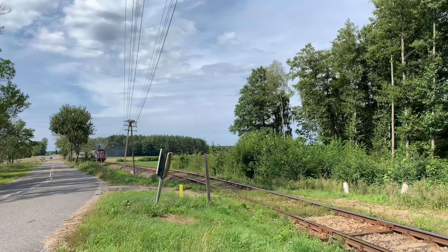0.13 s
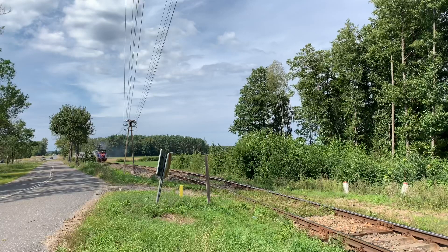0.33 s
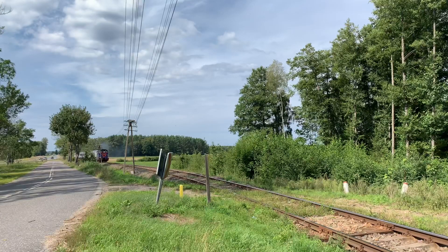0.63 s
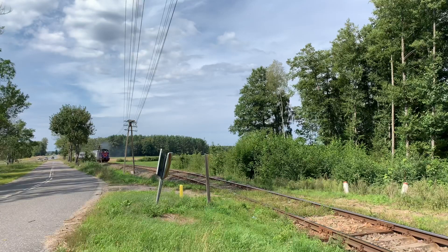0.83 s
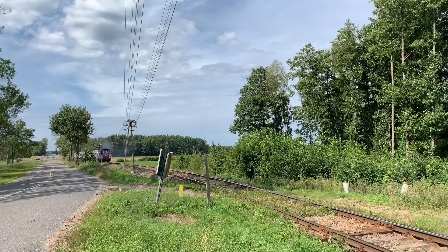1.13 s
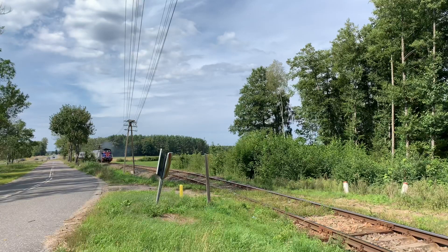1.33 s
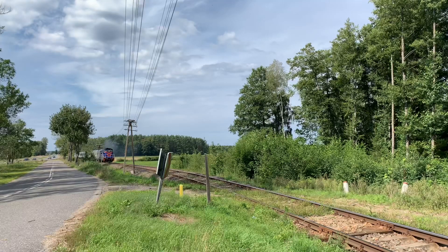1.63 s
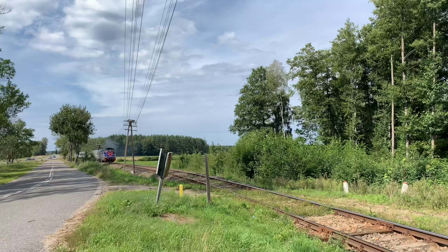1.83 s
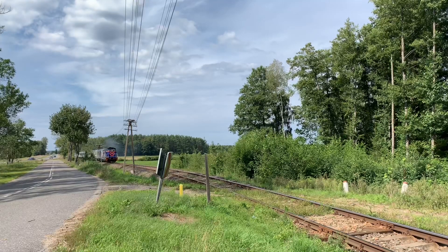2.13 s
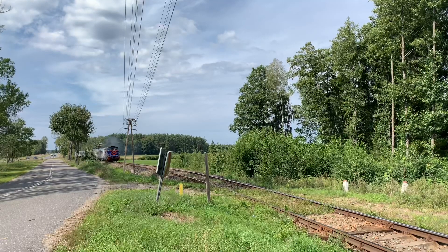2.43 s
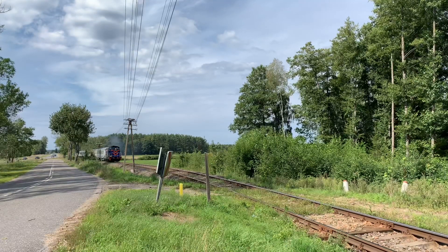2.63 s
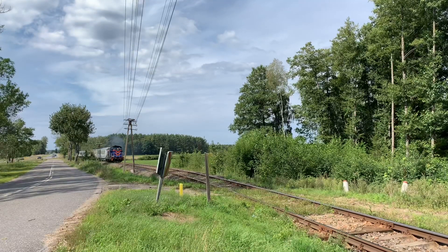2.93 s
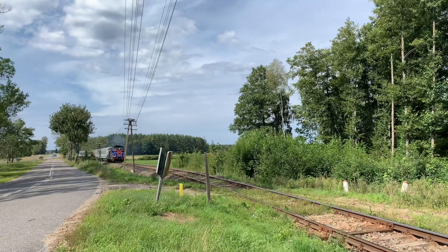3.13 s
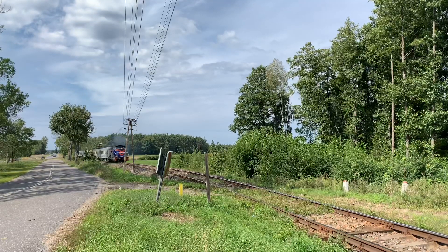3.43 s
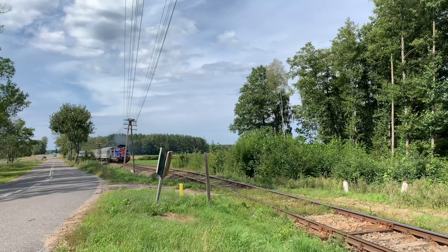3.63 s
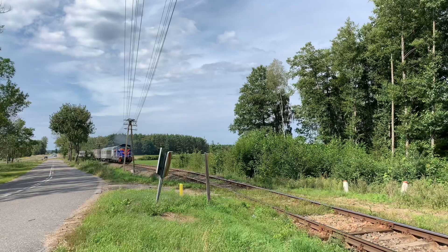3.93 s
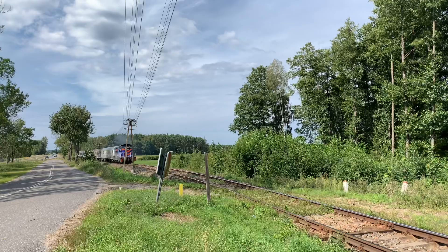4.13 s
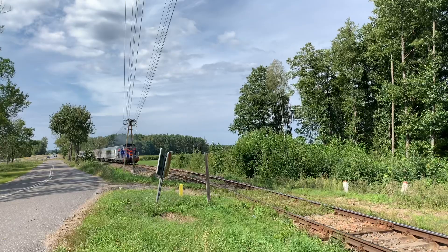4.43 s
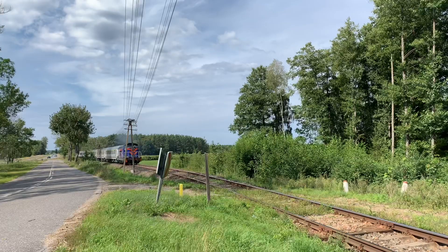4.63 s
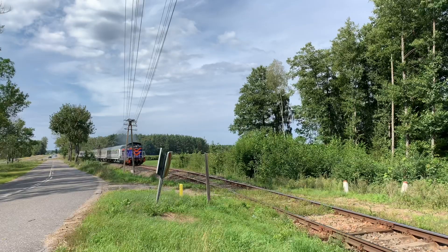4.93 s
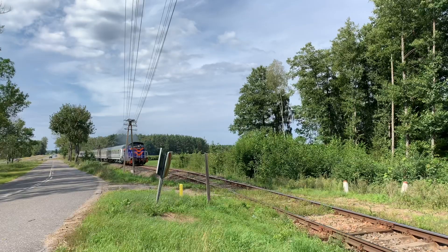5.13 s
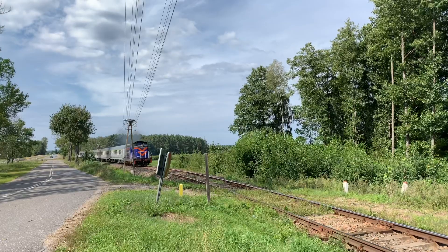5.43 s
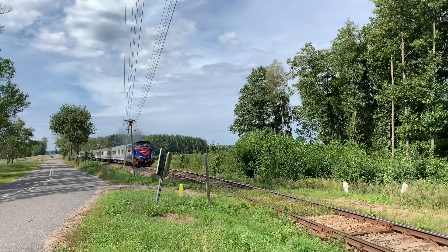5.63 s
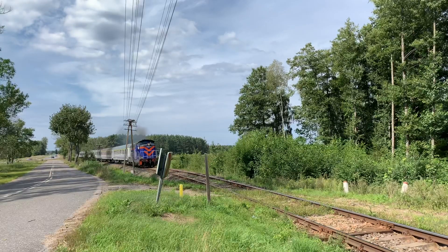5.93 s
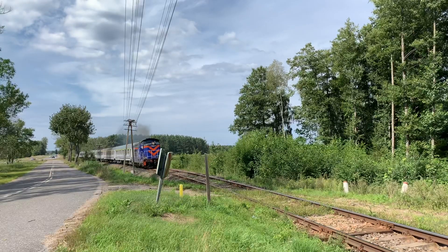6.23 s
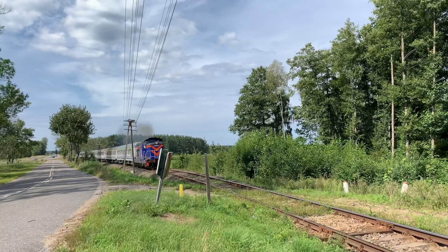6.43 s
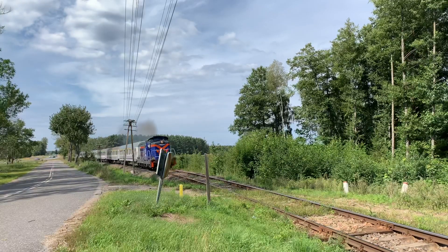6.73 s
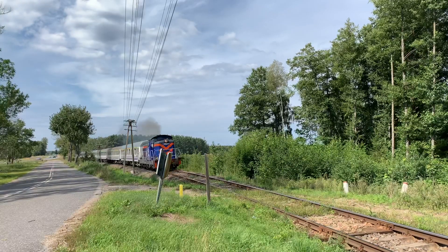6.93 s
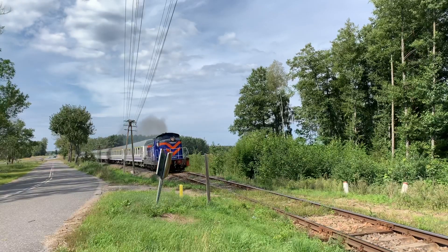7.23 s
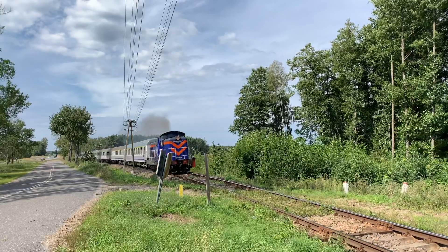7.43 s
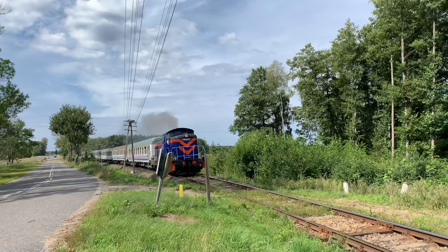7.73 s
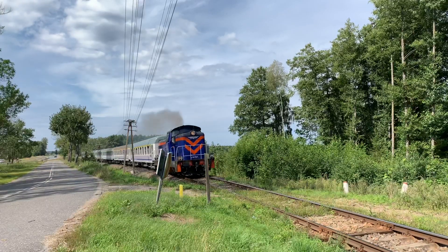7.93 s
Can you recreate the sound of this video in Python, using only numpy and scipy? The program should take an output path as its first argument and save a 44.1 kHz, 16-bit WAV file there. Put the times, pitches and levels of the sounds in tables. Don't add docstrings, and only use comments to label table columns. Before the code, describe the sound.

A distant diesel train sounds one short horn blast that echoes off trees, then its throbbing engine and rolling rumble slowly grow through buffeting wind.

```python
import sys
import numpy as np
from scipy import signal
from scipy.fft import rfft, irfft, next_fast_len
from scipy.io import wavfile

SR = 44100
rng = np.random.default_rng(int(sys.argv[2]) if len(sys.argv) > 2 else 0)


def ratio_of_db(decibels):
    return 10 ** (np.asarray(decibels, float) / 20)


def master_out(mix):
    frames = np.transpose(np.atleast_2d(mix))
    ceiling = np.clip(frames, -1, 1)
    pcm = np.round(ceiling * 32767).astype(np.int16)
    wavfile.write(sys.argv[1], SR, pcm)


N = 356769
T = np.arange(N) / SR
STEP = 16
COARSE = T[::STEP]
LEFT_RIGHT = np.array([[1], [-1]])

# (frequency [Hz], likeness [0-1], left lead [rad], left-right balance [dB])
PORTS = [(60, .8, .1, -.8), (150, .96, .1, -1), (350, .9, .4, -.5), (800, .55, .5, 2.5),
         (1160, .35, .75, 2.5), (1500, .25, 0, 2.5), (2300, .6, 1.6, 1), (3100, .7, 2.8, 0),
         (4700, .5, 1.8, -1.5), (6000, .5, 2.1, -1.5), (6900, .85, .7, -1), (7600, .9, 0, 0),
         (8600, .75, -1.5, 0), (10300, .95, -3.14, 0), (11700, .9, -4.2, 0), (13300, .9, -6.0, 0),
         (15300, .8, -7.9, 0)]

ARRIVAL_S, REFERENCE_S = 10.12, 5.36
LOAD_FROM_S, LOAD_FULL_S = 0.85, 3.6
# (time [s], level at the top [dB])
SCREEN = [(0, -30), (2.6, -25), (3.3, -22), (4.1, -17.5), (5.0, -13.5), (5.45, -11), (6.2, -16), (7.0, -11),
          (7.45, -8), (7.53, -1), (8.09, 2)]
# (frequency [Hz], share [1])
SCREEN_SHARE = [(400, 0.0057), (1000, 0.19), (2000, 0.18), (4000, 0.33), (6500, 1.07), (9000, 1.16)]

CYCLE_HZ = 7.852
PIPE_TURN_RAD = 2.75
WEAK_DB, WEAK_SPREAD = -9, 0.57
# (multiple of the engine cycle [1], level [dB], share of the approach [1])
STRONG_ORDERS = [(4, -29, 1.1), (12, -30.5, 1.21), (16, -33, 0.86)]
# (multiple of the engine cycle [1], level [dB])
WEAK_ORDERS = [(3, -51.5), (5, -46), (6, -40.5), (7, -28), (8, -42), (9, -38), (10, -56), (11, -33),
               (13, -36.5), (14, -36.5), (15, -33), (17, -40), (18, -47), (19, -34.5), (20, -51.5),
               (21, -45), (22, -55.5), (23, -58), (24, -63), (25, -59), (26, -53.5), (27, -62.5),
               (28, -57.5), (29, -58), (30, -42.5), (31, -60.5), (32, -41.5), (33, -41.5)]
# (order [1], time [s], level [dB], half length [s])
EXHAUST_FADES = [(4, 1.4, 5, 0.76), (4, 2.0, -5.5, 0.3), (4, 3.5, -13, 0.39), (4, 3.87, -4, .3),
                 (12, 0.052, 7, 0.44), (12, 1.7, -7.5, 0.44), (12, 3.8, -3.5, 1), (12, 6.06, 6, 0.49),
                 (16, 1.98, -10, 0.44), (16, 2.5, 6, 0.41), (16, 2.3, -6, 0.34), (16, 5.64, -6, 0.7),
                 (16, 7.58, 3.5, 0.6), (12, 6.05, -14, 0.089), (12, 6.55, -7, 0.098), (12, 8.5, -7, 0.037),
                 (12, 7.08, 2.5, .1), (12, 7.78, -4, .06), (12, 5.9, 3.5, .1), (12, 7.42, -4, 0.053),
                 (16, 6.2, 8, 0.16), (16, 6.1, -3, 0.088), (32, 7.7, 4, .1), (32, 6.9, 9.5, 0.11),
                 (32, 6.72, 17, 0.13), (32, 4.5, 7, 0.22), (32, 7.97, 16.5, 0.073)]

BLADES = 30.25
HUM_DB, HUM_IDLE_DB, GEAR_DB, GEAR_IDLE_DB, WHISTLE_DB = -30, -18, -40.5, -10.5, -74
# (time [s], shaft speed [Hz])
BLOWER_SPEED = [
    (0, 154.9),
    (1.5, 158.6),
    (2.8, 158.7),
    (3.45, 155.5),
    (3.8, 153.2),
    (4.2, 150.6),
    (6, 146.5),
    (8.09, 140),
]
# (multiple of the shaft hum [1], level [dB])
GEAR_PARTIALS = [(1.41, -19.5), (1.84, -9), (2.43, -9.5)]
# (time [s], level [dB], half length [s])
HUM_SWELL = [
    (2.5, 7, .2),
    (3.2, -4.5, 0.3),
    (3.7, -9, .07),
    (4.2, -9, 0.066),
    (5.55, -2.5, .1),
    (7, -4.5, 1.126),
]
# (time [s], level [dB], half length [s])
GEAR_SWELL = [
    (4.83, 9.5, 2.5),
    (3.88, 5, 0.17),
]
# (time [s], level [dB], half length [s])
WHISTLE_SWELL = [
    (3.85, 17.5, 2.19),
    (4.38, 8, 0.23),
    (2.7, 1, .2),
    (3.25, 12, .03),
    (3.65, -6, .04),
    (3.9, 3, .03),
    (3.99, 8, 0.07),
    (4.4, -10, .02),
]

RUMBLE_IDLE_DB, RUMBLE_TOP_HZ, ROAR_SPREAD, TOP_CLEAR_DB = -5.5, 380, 0.63, 14
BASS_FROM_HZ, BASS_SHARE = 90, .15
# (frequency [Hz], density [dB per Hz])
ROAR_COLOUR = [(24, 0), (42, 2), (64, -0.5), (160, -9), (370, -15), (520, -20), (850, -20.5), (1300, -33),
               (2320, -31), (3330, -36), (4660, -39), (5580, -57.5), (6500, -48), (7500, -51), (9100, -55),
               (10400, -62.5), (12200, -74)]

PANEL_DB, SQUEAL_DB, SQUEAL_SHARE, LOW_SQUEAL_SHARE = -36.5, -46.5, 3.1, 0.93
# (frequency [Hz], width [Hz], level [dB])
RAIL_TONES = [(1885, 50, -8), (1952, 35, -7.5), (2080, 25, -6), (2290, 140, -1), (2700, 350, 0),
              (4650, 300, -10), (7340, 120, -11)]
# (frequency [Hz], width [Hz], level [dB])
PANEL_MODES = [(385, 15, -28.5), (492.3, 21.5, -8.5), (578.4, 13, -16), (629.4, 26, -18), (253.3, 31, -10),
               (539.5, 90, -13), (768, 90, -14)]
# (time [s], level [dB], length [s])
JOINTS = [
    (5.126, -51.5, .05),
    (5.557, -53, 0.06),
    (7.1, -52, 0.042),
    (7.5, -40, 0.018),
    (7.575, -41, 0.06),
]
# (time [s], frequency [Hz],
# width [Hz], level [dB], length [s])
SHRIEKS = [(3.52, 2280, 220, -51.5, 0.26), (5.05, 2270, 90, -58, 0.22), (5.58, 1910, 170, -56, .24),
           (6.7, 2300, 130, -52, .09), (6.9, 2080, 30, -52, .07), (7.08, 2280, 200, -48.5, .16),
           (7.1, 1260, 250, -44, .12), (7.665, 7350, 200, -44, .018), (7.75, 7300, 300, -45, .008),
           (7.892, 7250, 200, -42, .014), (8.0, 7300, 120, -45, .05), (7.6, 280, 90, -35, 0.13),
           (5.45, 550, 170, -39.5, .4), (7.604, 1940, 140, -42, .03), (7.602, 1600, 150, -42, .02),
           (7.62, 2350, 200, -40, .04), (7.84, 2004, 150, -45, .02), (2.63, 388, 25, -41, .07),
           (8.042, 2240, 120, -39, 0.047)]

CALM_DB = -43
# (time [s], level over calm [dB], half length [s])
GUSTS = [(.6, -1, 0.11), (1.08, 9.5, 0.35), (1.62, 9.5, 0.35), (2.05, 15.5, 0.35), (2.4, 11, 0.29),
         (2.85, 12.5, 0.37), (3.4, 13, 0.65), (4.2, 14.5, 0.5), (4.65, 12, 0.33), (5.3, 15, 0.33),
         (5.6, 11, 0.17), (6.12, 12.5, 0.31), (7.12, 8, 0.1), (7.66, 8, 0.12)]
# (time [s], peak level
# [dB], # frequency [Hz], push +1 or pull -1)
KNOCKS = [(0, -17, 60, -1), (0.05, -2, 124.4, -1), (1.098, -6, 156, -1), (2.0595, -14, 151, 1),
          (2.091, -2, 97.5, -1), (2.488, -2.5, 100, 1), (2.681, -3.5, 115.8, -1), (2.9997, -3.5, 97.6, 1),
          (3.0888, -3, 118, 1), (3.2826, -3.5, 119, 1), (3.314, -4.5, 116, 1), (3.459, -4, 150, 1),
          (3.4832, 4, 154, -1), (3.58, -4.5, 133, -1), (3.6474, 3, 166, 1), (3.6917, 0.5, 99, 1),
          (3.906, -6, 123, -1), (4.1125, 2, 111, -1), (4.2078, -1, 116, -1), (4.865, -2.5, 115.4, -1),
          (5.0421, -0.5, 153, 1), (5.1563, -2.5, 142, 1), (5.543, -4, 96, 1), (6.243, -4, 106, -1),
          (6.328, -9, 129, -1), (6.4072, -6, 127, 1), (6.759, -9, 130, 1)]
# (time [s], level [dB], length [s])
BUFFETS = [
    (1.095, -32.5, 0.026),
    (2.063, -24.5, 0.037),
    (3.22, -29.5, 0.035),
    (3.464, -36.5, 0.032),
    (6.648, -32, 0.13),
]

CRICKET_HZ, CRICKET_WIDTH_HZ, CRICKET_DB, CHORUS_SHARE = 4684, 270, -56.5, 0.57
RASP_DB, RASP_SHARE, RASP_FLOOR_DB = -56.5, 1.7, -92
FIELD_DB, GRASS_DB = -47, -86.5
# (time [s], peak level [dB], lower band level [dB], decay [s])
TICKS = [(5.14, -70, 10, 0.036), (5.347, -54.5, 7, .017), (5.725, -71, 7, .02), (5.921, -57, -5, .016),
         (6.264, -58, 1, .018), (6.452, -62, 3, .02), (7.421, -52.5, -18, 0.055), (7.491, -45, -9, 0.033),
         (7.7513, -54.5, 1, 0.0091), (7.876, -57, 16, .02), (8.045, -54, -5, .03)]

HORN_HZ, HORN_DB, HORN_SAG_DB, AIR_DB = 388.3, -14, -1, -56
HORN_S, HORN_ATTACK_S, HORN_CLOSE_S, HORN_RELEASE_S = 1.219, 0.035, 1.969, 0.11
SPEAK_LATER_S, CLOSE_EARLIER_S = 0.0062, 0.0038
DROP_DB, DROP_DB_PER_PARTIAL, ECHO_DB_PER_S, ECHO_END_S = 9, 2, 41.5, 2.65
# (multiple of the pitch [1], level [dB])
HORN_ORDERS = [(1, -4.5), (2, 0), (3, -7), (4, -16), (5, -23.5), (6, -29), (7, -27), (8, -29.5), (9, -44.5),
               (10, -36.5), (11, -40.5), (12, -46), (13, -50), (14, -52.5), (15, -55), (16, -54),
               (17, -49.5), (18, -49.5), (19, -46.5), (20, -49), (21, -52.5), (22, -51.5), (23, -57.5),
               (24, -65), (25, -61.5), (26, -66.5), (27, -68), (28, -68.5), (29, -74)]
HORN_PAN_DB = [-0.5, 1, 2, 9, 8, 5.5, -1]
# (pitch ratio [1], delay [s], level [dB])
HORN_ECHOES = [
    (.935, .12, -29),
    (.95, .1, -51),
    (.965, .07, -28.5),
    (.98, .05, -35.5),
]
# (partial [1], time [s], left
# [dB], right [dB], half length [s])
HORN_FADES = [(1, 1.603, -14, -15, 0.2), (1, 1.99, 10, 6.5, 0.13), (1, 2.15, -4, -5.5, 0.094),
              (1, 2.3, 8, 10.5, 0.048), (1, 2, -9.5, -7.5, 0.092), (2, 1.748, -8, -6.5, 0.29),
              (2, 1.86, 6, -23, 0.09), (2, 2.06, -30, 2.5, 0.052), (2, 2.1, 9.5, -24, .04),
              (2, 1.62, 6.5, -3.5, 0.09), (3, 1.1, -5.5, -1, 0.27), (3, 1.66, 5, 1.5, 0.13),
              (3, 1.75, -8, -6, 0.067), (3, 1.945, -2.5, -6, 0.11), (3, 1.9, -7, 0.5, 0.072),
              (3, 2, 3, 8.5, 0.046), (4, 1.9, -2.5, -6, 0.14), (4, 2.2, -1, -8, .05),
              (2, 1.26, -6, -6, 0.055), (3, 2.3, 4, 0, 0.034), (4, 2.0, -10, -6, 0.09),
              (3, 2.14, -12, 3.5, .035), (3, 2.6, 6, 7, .05), (3, 2.1, -9, -5, .025), (2, 2.2, 5, -6, .08),
              (2, 2.15, 1.5, 4, .035), (2, 2.28, -3, -10, .025), (2, 2.33, 2, 1, .04),
              (4, 2.19, 8, 0, 0.045), (3, 2.245, 5, 8, 0.061), (3, 1.97, -4, -3, .04), (2, 1.6, -5, 1, .06),
              (2, 2.075, 3, 6, .03), (4, 1.6, 0.5, -6, .06), (4, 1.5, -0.5, -8.5, 0.0247),
              (4, 1.86, 0, -9, .025), (3, 2.25, -1, 4, .12), (5, 1.75, 1, 5, .12),
              (6, 1.72, -1, -4.5, 0.18), (7, 1.66, 5, 6.5, 0.086),
              (5, 1.29, 5, 2, 0.055), (5, 1.37, 5.5, -5, .05), (5, 1.5, 2, -8, .06), (5, 1.6, -4, 0.5, .12),
             (5, 1.93, 1.5, 3, .09), (5, 1.81, -8, -1, .04), (5, 1.85, 4.5, -6, .04), (6, 1.29, 1, 8, .04),
             (6, 1.36, 2, -5, .07), (6, 1.47, -7, -2.5, .07), (6, 1.65, 4, 12, 0.12), (6, 1.78, -6, 6, .11),
             (6, 1.85, -1, -9, .05), (6, 1.8, 0, 4, .05), (7, 1.27, 7, 9.5, 0.044),
             (7, 1.49, -10, -15, .07), (7, 1.8, -7, -10, .05), (4, 1.6, -0.5, -3.5, 0.15),
             (7, 1.77, -11, -11, 0.041), (7, 1.85, 4, 6, .05), (7, 2.09, 20.5, 17, 0.13),
             (7, 2, 9, 10, .06), (8, 1.36, -8, -8, .08), (8, 1.75, -4, -3, .05), (8, 1.53, -8, -8, .1),
             (8, 2.02, 12.5, 13, .08), (9, 1.8, 9, 9, .2), (10, 1.41, 4.5, 6, .07), (10, 1.62, 4, 9, .07),
             (10, 1.85, -8, -9, .04), (10, 2.016, 16, 12, 0.12), (11, 1.36, 7, 10, 0.043),
             (11, 1.66, 9, 6, .08), (11, 1.6, -7, -7, .04), (4, 2.1, -6, 5, .3), (3, 2.9, -3, 6, .13),
             (5, 1.67, 1, -8, .025), (5, 2.2, 10, 10, .035), (7, 2.17, 12, 6.5, .04), (6, 1.6, -2, -8, .02)]
# (time [s], level [dB], half length [s])
SHIMMER = [
    (1.29, -1, .03),
    (1.4, 5.5, 0.047),
    (1.48, -3, .04),
    (1.53, 4, .025),
    (1.59, 7.5, .03),
    (1.63, -5, .025),
    (1.7, 5.5, .05),
    (1.82, -3, .03),
    (1.88, 6, 0.054),
    (2.0, 14, 0.11),
]


def rms_one(x):
    return x / np.sqrt(np.mean(x ** 2) + 1e-20)


def in_time(rows):
    s, *columns = np.transpose(rows)
    return [np.interp(T, s, c) for c in columns]


def at_hz(points, hz, axis=1):
    return np.interp(np.log(hz), np.log(np.array(points)[:, 0]), np.array(points)[:, axis])


def drift(rate_hz, t=T):
    r = np.exp(-128 * np.pi * rate_hz / SR)
    slow = signal.lfilter([1], [1, -2 * r, r * r], rng.standard_normal(N // 64 + 1502))[1500:]
    return np.interp(t * SR / 64, np.arange(len(slow)), rms_one(slow))


def band(x, low_hz, high_hz, order=2):
    return signal.sosfilt(signal.butter(order, [low_hz, min(high_hz, .45 * SR)], "band", fs=SR, output="sos"), x)


def swells(rows, t=T):
    return sum(db * np.maximum(1 - np.abs(t - s) / half, 0) for s, db, half in rows) + 0 * t


def tone(phase, hz, pan_db=None, aside=0):
    pan_db = at_hz(PORTS, hz, axis=3) if pan_db is None else pan_db
    share = 1 / (1 + ratio_of_db(-pan_db))
    lead = at_hz(PORTS, hz, axis=2) / 2 + aside
    return np.sqrt(8) * np.array([share * np.sin(phase + lead), (1 - share) * np.sin(phase - lead)])


def port_noise():
    size = next_fast_len(N)
    hz = np.maximum(np.fft.rfftfreq(size, 1 / SR), 1)
    common, *own = rfft(rng.standard_normal((3, size)))
    alike = np.clip(at_hz(PORTS, hz), 0, 1)
    turn = np.exp(.5j * LEFT_RIGHT * at_hz(PORTS, hz, axis=2))
    mix = np.sqrt(alike) * common * turn + np.sqrt(1 - alike) * np.array(own)
    return irfft(mix * ratio_of_db(LEFT_RIGHT * at_hz(PORTS, hz, axis=3) / 2), size)[:, :N]


def narrow(white, modes, db, flicker_db):
    out = 0
    for hz, width, mode_db in modes:
        flicker = flicker_db * np.tanh(drift(7, COARSE))
        gain = np.interp(T, COARSE, ratio_of_db(db[::STEP] + mode_db + flicker))
        out = out + gain * rms_one(band(white, hz - width / 2, hz + width / 2))
    return out


def near_db(t=T):
    return 20 * np.log10((ARRIVAL_S - REFERENCE_S) / (ARRIVAL_S - t))


def idle():
    return np.interp(T, [LOAD_FROM_S, LOAD_FULL_S], [1, 0])


def exhaust_fade_db(order, t):
    return swells([row[1:] for row in EXHAUST_FADES if round(row[0]) == round(order)], t)


def engine():
    t = COARSE
    thump_db, third_db, fourth_db = [db + share * near_db(t) + exhaust_fade_db(k, t) for k, db, share in STRONG_ORDERS]
    beat = 2 * np.pi * (4 * CYCLE_HZ * t + .25) + .15 * drift(1.5, t)
    out = ratio_of_db(thump_db + 1.1 * drift(3, t)) * tone(beat, 31)
    for k, db in [(3, third_db), (4, fourth_db)]:
        locked = k * (beat - np.pi / 2) + np.pi / 2 + PIPE_TURN_RAD
        out += ratio_of_db(db + 1.5 * drift(9, t)) * tone(locked + 0.38 * drift(0.61, t), 110)
    weak_db = WEAK_DB + WEAK_SPREAD * near_db(t)
    for k, db in WEAK_ORDERS:
        phase = 2 * np.pi * (k * CYCLE_HZ * t + rng.random()) + 0.046 * k * drift(1.3, t)
        level_db = db + exhaust_fade_db(k, t) + weak_db + 3 * drift(3, t)
        out += ratio_of_db(level_db) * tone(phase, k * CYCLE_HZ)
    return signal.resample_poly(out, STEP, 1, axis=1, padtype="line")[:, :N]


def blower():
    shaft_hz, = in_time(BLOWER_SPEED)
    hum_db = HUM_DB + HUM_IDLE_DB * idle() + swells(HUM_SWELL)
    gear_db = GEAR_DB + GEAR_IDLE_DB * idle() + swells(GEAR_SWELL)
    whistle_db = WHISTLE_DB + swells(WHISTLE_SWELL)
    turn = 2 * np.pi * np.cumsum(shaft_hz) / SR
    out = ratio_of_db(hum_db + 2.2 * drift(8)) * tone(turn + .4 * drift(2.0), 150)
    for k, db in GEAR_PARTIALS:
        out += ratio_of_db(gear_db + db + 2.0 * drift(4.8)) * tone(k * turn + 0.23 * drift(3.0), 150 * k)
    return out + ratio_of_db(whistle_db + 3.5 * drift(35)) * tone(BLADES * turn + 1.1 * drift(40), 4650)


def roar():
    t = COARSE
    screen_db = in_time(SCREEN)[0][::STEP] + TOP_CLEAR_DB
    spread_db = ROAR_SPREAD * near_db(t)
    rumble_db = RUMBLE_IDLE_DB * idle()[::STEP] + 1.6 * drift(9.7, t)
    white = [port_noise(), port_noise()]
    together = drift(3.1, t)
    throb = np.cos(2 * np.pi * 4 * CYCLE_HZ * t)
    third_octaves = 22 * 2 ** (np.arange(24) / 3)
    edges = np.append(third_octaves, np.geomspace(5600, 12400, 7))
    out = 0
    for k, (low, high) in enumerate(zip(edges, edges[1:])):
        hz = np.sqrt(low * high)
        growth = BASS_SHARE + (1 - BASS_SHARE) / (1 + (BASS_FROM_HZ / hz) ** 4)
        rise_db = spread_db * growth + at_hz(SCREEN_SHARE, hz) * screen_db
        rise_db = rise_db + rumble_db / (1 + (hz / RUMBLE_TOP_HZ) ** 4)
        db = at_hz(ROAR_COLOUR, hz) + rise_db + 0.65 * together + 1.63 * drift(9.9, t) + 0.79 * throb
        out = out + np.interp(T, t, ratio_of_db(db)) * band(white[k % 2], low, high)
    return ratio_of_db(-2) * out


def rail():
    white = port_noise()
    screen_db, = in_time(SCREEN)
    high_tones = [mode for mode in RAIL_TONES if mode[0] > 3000]
    low_tones = [mode for mode in RAIL_TONES if mode[0] < 3000]
    out = narrow(white, high_tones, SQUEAL_DB + SQUEAL_SHARE * screen_db - 3.5, flicker_db=9.5)
    out += narrow(white, low_tones, SQUEAL_DB + LOW_SQUEAL_SHARE * screen_db, flicker_db=5.5)
    out += narrow(white, PANEL_MODES, PANEL_DB + ROAR_SPREAD * near_db(), flicker_db=6.0)
    for s, hz, width, db, length in SHRIEKS:
        near = slice(int((s - .7) * SR), int((s + .7) * SR))
        envelope = ratio_of_db(db) * np.exp(-((T[near] - s) / length) ** 2)
        out[:, near] += envelope * rms_one(band(white[0, ::-1][near], hz - width / 2, hz + width / 2))
    clatter = sum(ratio_of_db(db) * np.exp(-((T - s) / length - .5) ** 2 * 4) for s, db, length in JOINTS)
    return out + clatter * rms_one(band(np.roll(white, SR, axis=1), 4200, 9000, order=1))


def wind():
    lumps = np.array([ratio_of_db(10.0 * np.tanh(0.65 * drift(21))) for port in LEFT_RIGHT])
    eddies = lumps * rng.standard_normal((2, N))
    gust_db = CALM_DB + swells(GUSTS)
    out = ratio_of_db(gust_db + 4.5) * rms_one(band(eddies, 36, 210, order=3))
    out += ratio_of_db(gust_db - 10) * rms_one(band(eddies[0], 200, 520))
    for s, db, hz, push in KNOCKS:
        near = slice(max(int((s - .03) * SR), 0), int((s + .03) * SR))
        cycles = (T[near] - s) * hz
        swing = np.exp(-(cycles / 0.52) ** 2) * np.cos(2 * np.pi * cycles)
        spike = .3 * np.exp(-(cycles / .12) ** 2)
        out[:, near] += np.sign(push) * ratio_of_db(db - 11.5) * (swing + spike)
    buffet = sum(ratio_of_db(db) * np.exp(-((T - s) / length) ** 2) for s, db, length in BUFFETS)
    return out + buffet * rms_one(band(rng.standard_normal(N), 160, 352))


def insects():
    screen_db, = in_time(SCREEN)
    steady = ratio_of_db(np.maximum(RASP_DB + RASP_SHARE * screen_db, RASP_FLOOR_DB))
    white = port_noise()
    high, low = steady, np.zeros(N)
    for s, peak_db, low_db, decay in TICKS:
        burst = (T > s) * np.minimum((T - s) / .004, 1) * np.exp(-np.abs(T - s) / decay)
        high = high + ratio_of_db(peak_db) * burst
        low = low + ratio_of_db(peak_db + low_db - 5.5) * burst
    wide = np.clip(np.log(high / steady), 0, 1)
    singers = [(hz, 200, (11400 - hz) / 350) for hz in np.geomspace(11400, 14600, 9)]
    rasp = rms_one(narrow(white, singers, np.zeros(N), flicker_db=6.0))
    rasp = rasp + .8 * wide * rms_one(band(white, 12000, 15000, order=3))
    rasp = high * ratio_of_db(1.5 * drift(14)) * rasp
    chorus = rms_one(band(white, CRICKET_HZ - CRICKET_WIDTH_HZ / 2, CRICKET_HZ + CRICKET_WIDTH_HZ / 2))
    chorus_db = CRICKET_DB + 6 + CHORUS_SHARE * screen_db + 2.0 * drift(33)
    field = ratio_of_db(FIELD_DB) * rms_one(band(rng.standard_normal((2, N)), 450, 1250))
    grass = ratio_of_db(GRASS_DB) * rms_one(band(white, 8600, 11500))
    return field + grass + rasp + low * rms_one(band(white, 8000, 9000)) + ratio_of_db(chorus_db) * chorus


def horn_blow_db(k, t):
    start = HORN_S + SPEAK_LATER_S * min(k - 1, 2)
    close = HORN_CLOSE_S - CLOSE_EARLIER_S * min(k - 1, 16)
    stopped_db = HORN_SAG_DB - DROP_DB - DROP_DB_PER_PARTIAL * min(k - 1, 9)
    blow_db = HORN_DB + np.interp(t, [start, start + HORN_ATTACK_S, close, close + HORN_RELEASE_S],
                                  [-40, 0, HORN_SAG_DB, stopped_db])
    return blow_db - ECHO_DB_PER_S * np.maximum(t - close - HORN_RELEASE_S, 0)


def horn_fade_db(k, t):
    rows = [row for row in HORN_FADES if round(row[0]) == k]
    return np.array([swells([(s, both[side], half) for p, s, *both, half in rows], t) for side in range(2)])


def horn_echoes(k, t, blow_db, db):
    out = 0
    for ratio, late, echo_db in HORN_ECHOES:
        phase = 2 * np.pi * k * ratio * HORN_HZ * t + .4 * k * drift(3.4, t)
        level = np.interp(t - late, t, blow_db) + db + echo_db + 3.5 * drift(9.3, t)
        out = out + ratio_of_db(level) * tone(phase, k * HORN_HZ, 6.0 * drift(4, t))
    return out


def horn():
    first, last = int((HORN_S - .05) * SR), int(ECHO_END_S * SR)
    t = T[first:last]
    gate = np.interp(t, [t[0], t[0] + .03, t[-1] - .15, t[-1]], [0, 1, 1, 0])
    tail = np.interp(t, [1.96, 2.1], [0, 1])
    flutter = 1.5 * drift(30, t) + swells(SHIMMER, t)
    out = 0
    for k, db in HORN_ORDERS:
        k = round(k)
        blow_db = horn_blow_db(k, t)
        level = blow_db + db + horn_fade_db(k, t)
        level += (k > 12) * flutter + (k > 7) * 1.3 * drift(12, t)
        level += (.7 + .15 * min(k - 1, 6) + 1.6 * tail) * drift(25, t)
        turn, wander = rng.random(), drift(12, t)
        phase = 2 * np.pi * (k * HORN_HZ * t + turn) + (.05 * min(k, 10) + .7 * tail) * wander
        aside = (k > 1) * tail * (.65 + .3 * wander)
        if k < 8:
            pan_db = HORN_PAN_DB[k - 1] + 1.2 * drift(9, t) * (k > 1)
        else:
            pan_db = 5.6 * drift(9.3, t)
        out = out + ratio_of_db(level) * tone(phase, k * HORN_HZ, pan_db, aside)
        if k < 6:
            out = out + horn_echoes(k, t, blow_db, db)
    air = rms_one(band(rng.standard_normal(len(t)), 5700, 7800))
    out = out + ratio_of_db(blow_db + AIR_DB + flutter / 2) * air
    return np.pad(gate * out, [(0, 0), (first, N - last)])


def scene():
    train = engine() + blower() + roar() + rail()
    nearby = wind() + insects()
    train = train + horn()
    train = signal.sosfilt(signal.cheby2(8, 40, 13200, fs=SR, output="sos"), train)
    return train + nearby


def top_cut(x):
    return signal.sosfilt(signal.butter(12, 15650, fs=SR, output="sos"), x)


def record(dry):
    x = signal.sosfilt(signal.butter(3, 24, "high", fs=SR, output="sos"), dry)
    both = x.mean(axis=0)
    gap = signal.cheby2(6, 25, [9750, 11250], "bandstop", fs=SR, output="sos")
    x = x - both + signal.sosfiltfilt(gap, both)
    return top_cut(x)


dry = scene()
out = record(dry)
master_out(out)
```